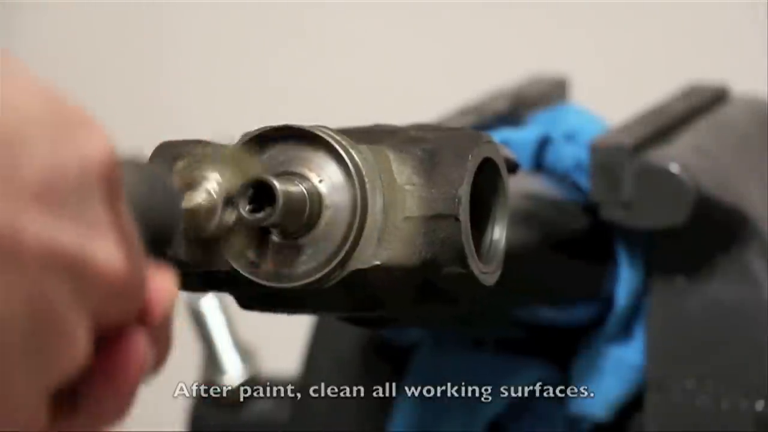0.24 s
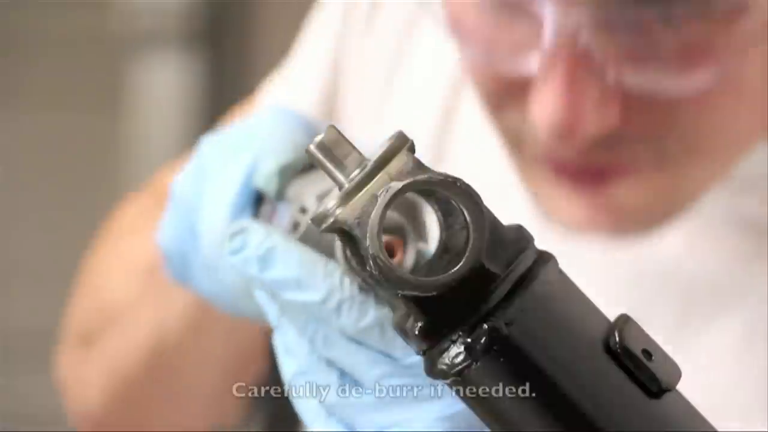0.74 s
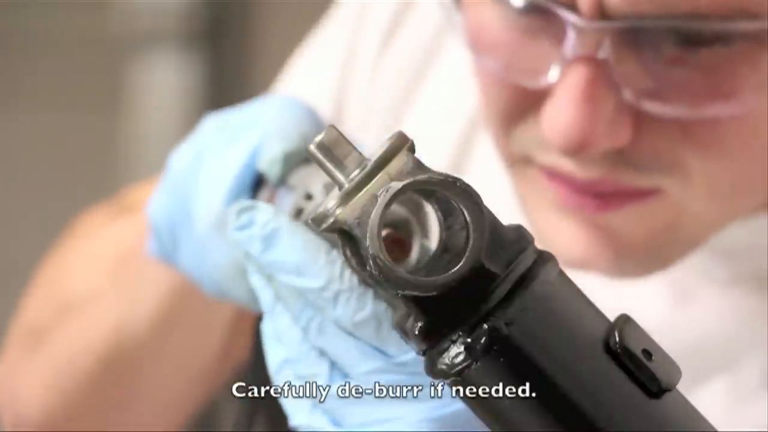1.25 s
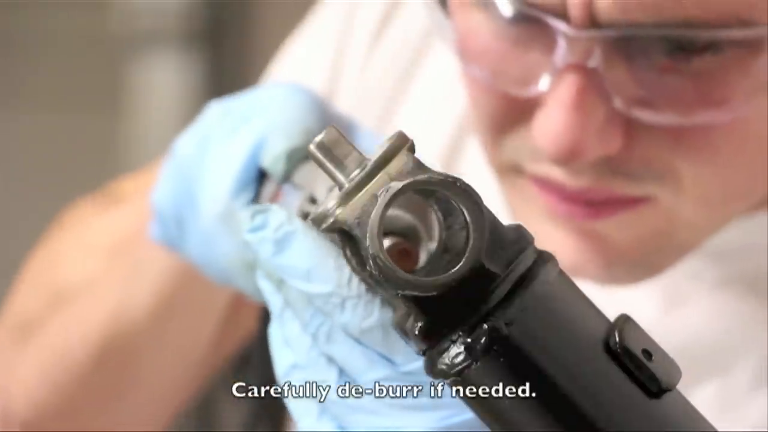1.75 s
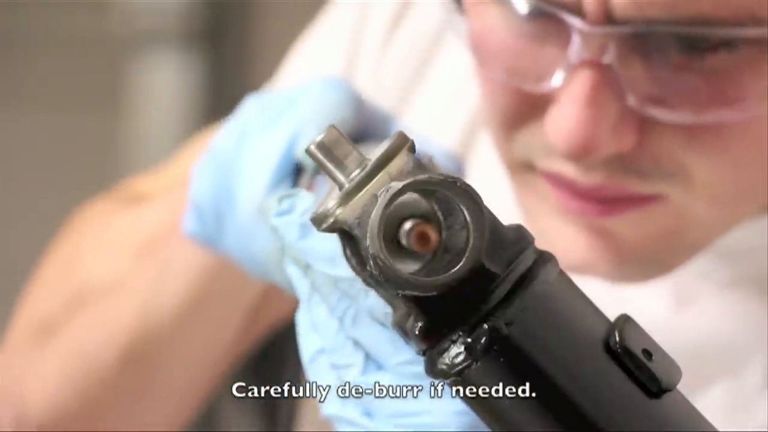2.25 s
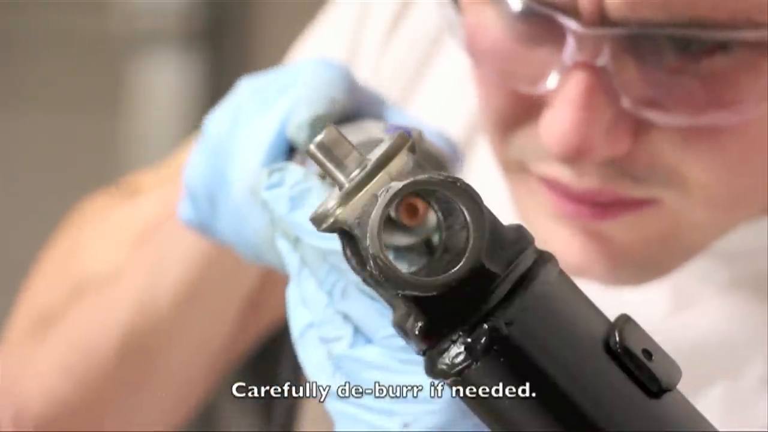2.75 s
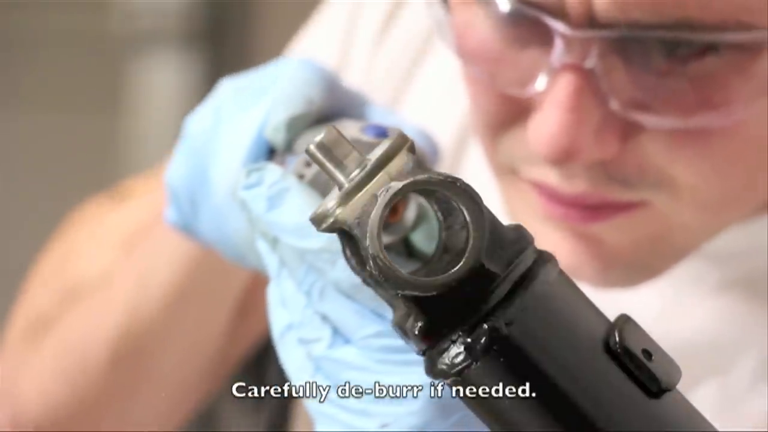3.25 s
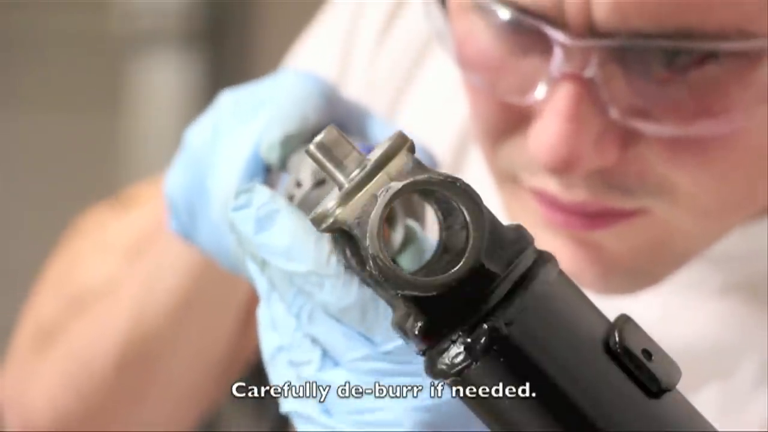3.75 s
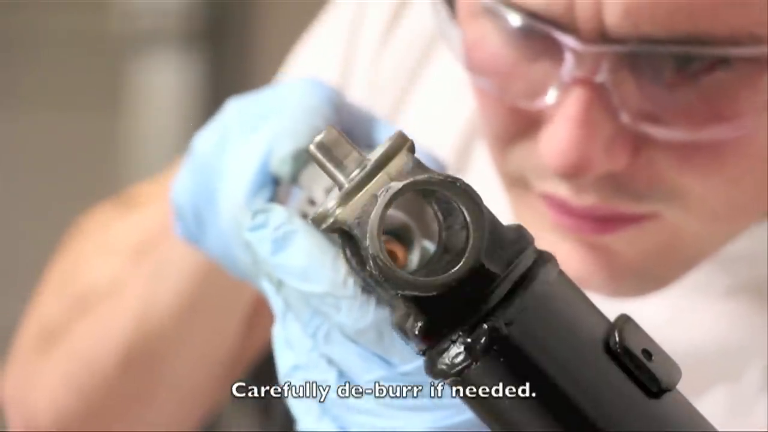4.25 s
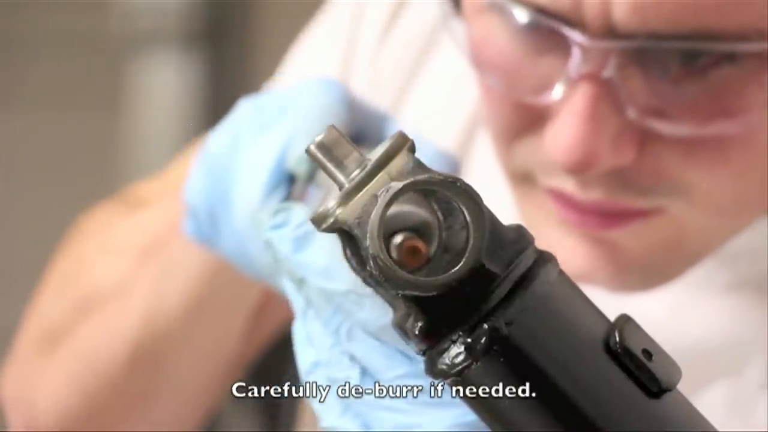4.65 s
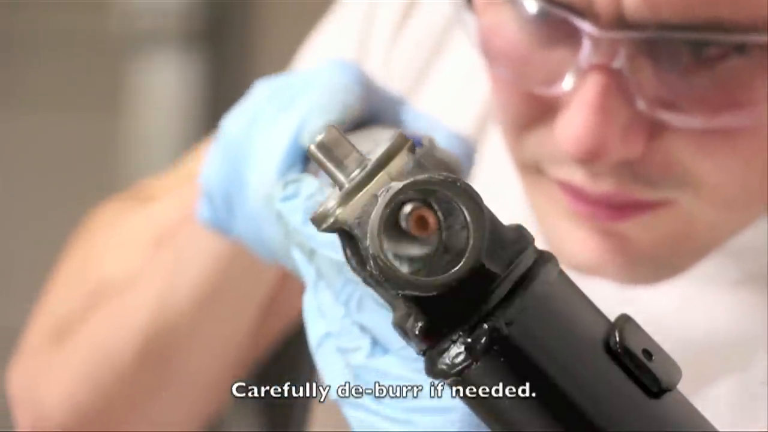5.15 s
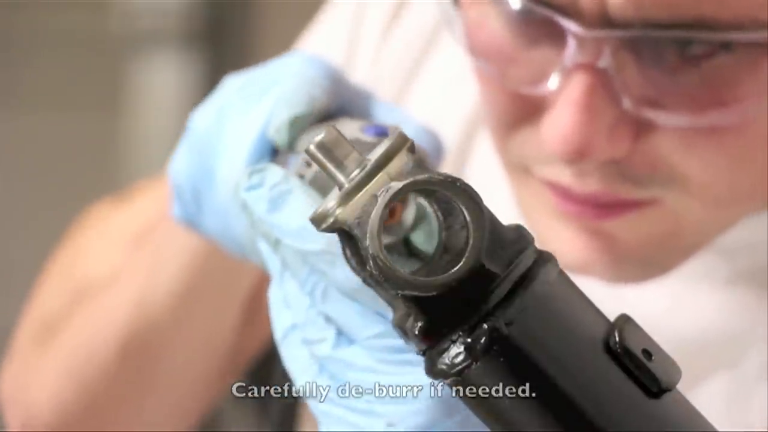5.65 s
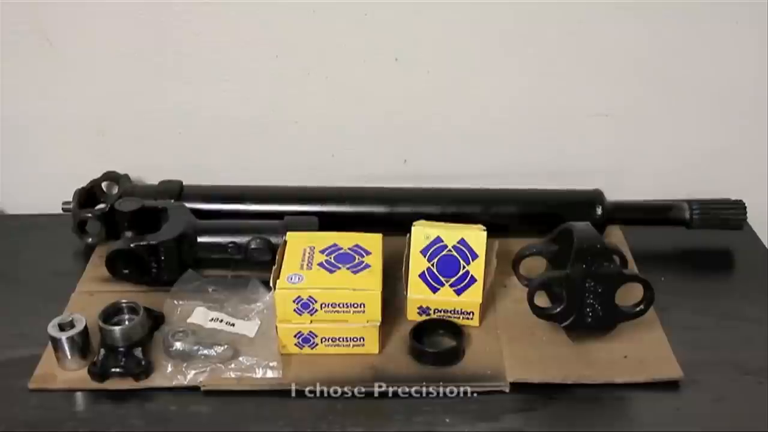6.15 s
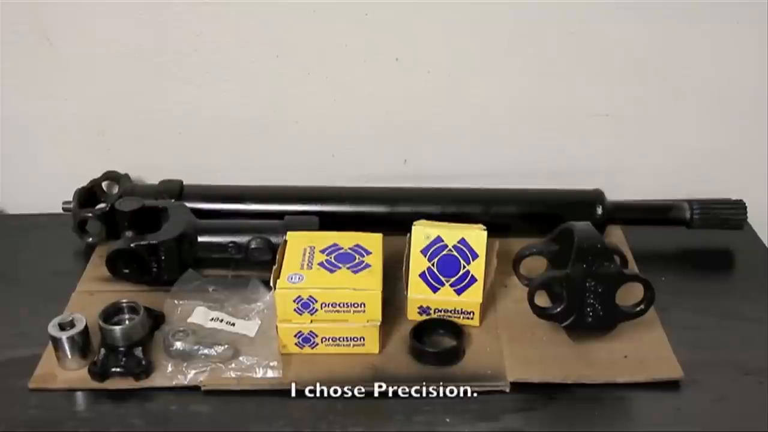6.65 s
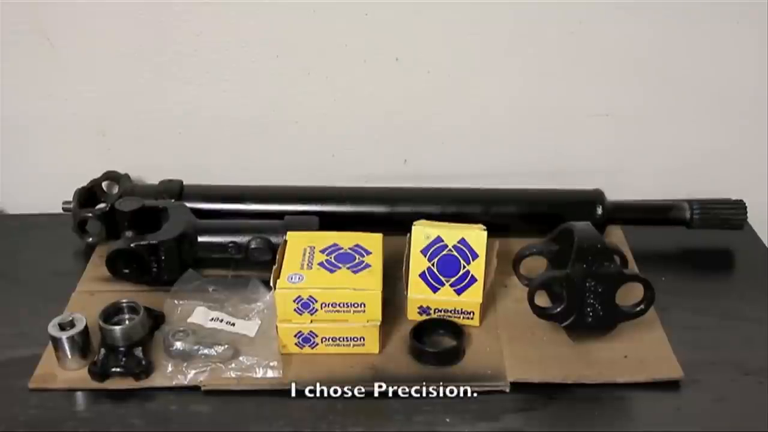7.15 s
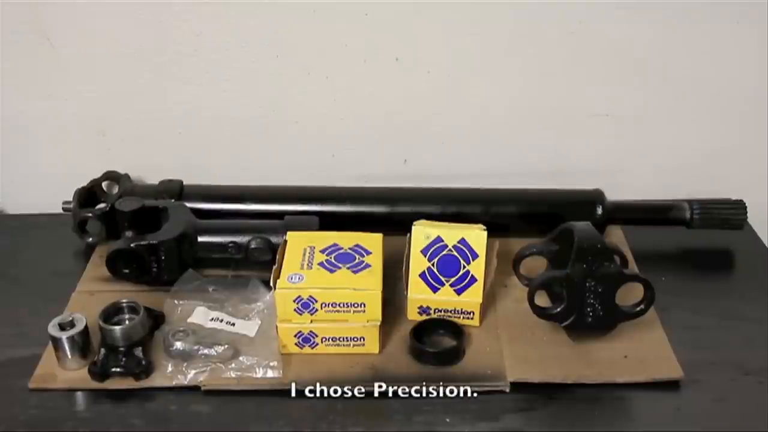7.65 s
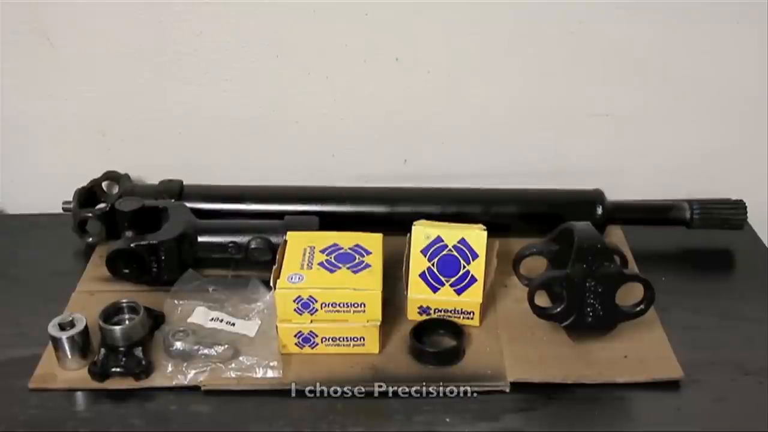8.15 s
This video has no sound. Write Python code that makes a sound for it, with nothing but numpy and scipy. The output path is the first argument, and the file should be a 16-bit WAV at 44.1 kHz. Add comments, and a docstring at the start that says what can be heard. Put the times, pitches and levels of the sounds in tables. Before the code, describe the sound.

Brief harsh metal brushing, then a high motor whine that turns rough and shrill as it grinds a bore, ending abruptly in faint room air.

```python
"""A mains-driven rotary tool in a workshop, in three scenes with fades around the cuts. First a wire brush
scrubs a metal joint: coloured noise for the bristles, ringing modes for the joint, shaft orders for the growl.
Then a grinding stone whines freely and is led round a bore: drifting shaft orders, a rough bed of blurred orders,
a hiss of grit and steel that rings and squeals. Last comes the quiet room, filtered noise and soft drones that
also lie under the tool, with a few decaying ticks and a faint swish."""
import sys
import numpy as np
from scipy import signal
from scipy.fft import rfft, irfft
from scipy.io import wavfile
from scipy.ndimage import uniform_filter1d

SR = 44100
rng = np.random.default_rng(int(sys.argv[2]) if len(sys.argv) > 2 else 0)


def transcribe(signal):
    """Save signal, clipped to [-1, 1], as a 16-bit WAV file at the path in sys.argv[1]."""
    frames = np.atleast_2d(signal).T
    limited = np.clip(frames, -1, 1)
    pcm = np.round(limited * 32767).astype(np.int16)
    wavfile.write(sys.argv[1], SR, pcm)


N = 370440
TIME = np.arange(N) / SR

# Fades around the cuts: t/s, gain/0-1
FADES = [(0, 0.91), (.53, 0.92), (.624, 0), (.632, 0), (.66, 0.54), (.72, 1), (5.86, 0.9), (5.997, 0),
         (6.001, 0), (6.006, 0.3), (6.12, 0.99), (8.4, 1)]
# Cuts between the three scenes: t/s
CUTS_S = (.628, 6.0)
MAINS_HZ = 120.0  # torque ripple, twice the line frequency
EDGE_HZ = 15750  # upper band limit

# Brush on the joint, levels before trims: t/s, scrub level/dB, shaft f/Hz, growl level/dB,
# squeal level/dB, vise level/dB
BRUSH = [(0.02, -26.5, 104.1, -47, -33, -47), (0.096, -26, 103.8, -40.5, -28.5, -44),
         (0.172, -27, 100.6, -47.5, -36, -35), (0.27, -27, 96.3, -44, -44, -37.5),
         (0.3, -27.5, 104.7, -46, -52, -42), (0.346, -27, 104.3, -46, -32.5, -32),
         (0.488, -29, 103.4, -48.5, -28, -44), (0.5, -28, 101, -71, -34, -47),
         (0.518, -29, 99.9, -50, -30, -59), (0.54, -29.5, 103.5, -55, -35, -49)]
# Colour of the bristle hiss: f/Hz, relative level per Hz/dB
BRISTLES = [(35, -52), (60, -35), (105, -28), (201, -60), (232, -24), (405, -13), (937, -15), (1360, -7.5),
            (1680, -15), (2070, -4.5), (2220, -4.5), (2490, -3), (3530, -10), (7440, -15.5), (15700, -27)]
SQUEAL_HZ = 2078
# Modes of the joint: f/Hz, width/Hz, relative level/dB
JOINT = [(2320, 14, -10), (2428, 18, -8), (2560, 14, -7), (2666, 25, -11), (3188, 10, -11), (3255, 8, -7),
         (4346, 8, -10), (4561, 12, -13), (4652, 14, -15), (7214, 25, -15), (7644, 30, -19)]
# Joint modes that sing out: f/Hz
SINGING_HZ = (2428, 2560, 3188, 3255, 4346, 4561)
# The brush finds one spot and one mode sings, a list for each of SINGING_HZ: start t/s, length/s, level/dB
JOINT_SINGS = [
    [(.12, .13, -32), (.47, .1, -36)],
    [(-.04, 0.23, -38), (.4, 0.24, -39)],
    [(0.183, 0.242, -43)],
    [(-.05, 0.25, -37), (.4, 0.13, -39)],
    [(-.06, .14, -29.5), (.06, .14, -41)],
    [(0.31, .12, -31)],
]
# Hum under the brush: f/Hz, level/dB
BRUSH_HUM = [(242, -55)]
# Growl of shaft orders 1 to 7 in turn: relative level/dB
GROWL_DB = [-8, -33, -2.5, -2, -4, -6, 1]

# Shaft speed with the stone, running up free and sagging under load: t/s, f/Hz
SPEED = [(.63, 230.5), (.8, 236.4), (1.0, 240.2), (1.2, 242.2), (1.7, 244.8), (1.9, 243.1), (1.98, 241.7),
         (2.2, 236.4), (2.43, 232.7), (2.6, 230.3), (2.8, 229.2), (2.93, 230.2), (3.03, 229.2),
         (3.18, 227.1), (3.7, 226.7), (3.8, 226.0), (4.0, 225.8), (4.1, 225.2), (4.23, 225.4), (4.4, 223.8),
         (4.6, 223.4), (4.85, 222.4), (5.13, 222.4), (5.3, 224.8), (5.42, 226.7), (5.6, 226.8),
         (5.73, 225.9), (5.95, 227.3)]
TURN_HZ = 230  # typical shaft speed with the stone
JITTER_TURNS = .004  # rms: the cutting stone snags and the shaft runs unevenly
TOUCH_S, TOUCH_RISE_S = 1.725, 0.013  # the stone meets the bore
# Contact in the free run, first bite and steady grinding: t/s, rough bed level over hiss/dB,
# ripple depth before unevenness/rad, wall resonance level/dB
CONTACT = [(.63, -12, 0.52, 2.5), (1.72, -15, 0.2, 2), (1.76, -1.5, 1.77, 6), (2.15, 0, 0.52, 15.5),
           (2.35, 1.5, 0.43, 2), (6, 0.5, 0.65, 4)]

# Unbalance of the shaft, before flutter: t/s, order 1 level/dB, order 2 level/dB, order 3 level/dB
SHAFT = [(.63, -57, -50, -53), (1.0, -50, -63, -44), (1.3, -48, -72, -44.5), (1.45, -50, -69, -52),
         (1.68, -57, -51, -52), (1.76, -45.5, -37.5, -48), (2.0, -56, -46, -47), (2.1, -53, -55, -50),
         (2.25, -49, -43, -40), (2.45, -50, -51.5, -39), (2.55, -47, -36.5, -43), (2.75, -47.5, -35.5, -48),
         (2.95, -43, -32, -39), (3.15, -55.5, -45.5, -35.5), (3.4, -55, -45, -41), (3.55, -45.5, -50, -45),
         (3.7, -40.5, -40, -55), (3.95, -37.5, -44, -48), (4.2, -38.5, -37.5, -45), (4.6, -55, -35.5, -49),
         (4.95, -44, -32, -53), (5.25, -36, -29.5, -43), (5.33, -38, -41, -45), (5.4, -44, -51, -46),
         (5.55, -48, -42, -42), (5.72, -59, -43.5, -48), (5.95, -44.5, -48, -43.5)]
# Shaft orders that stand out: order number
LOUD = (15, 16, 17, 20, 21, 23, 4, 5, 6, 7, 8, 9, 10, 11, 12, 13, 14, 18, 19, 22, 26, 24, 25)
# Each order in LOUD running free, before flutter: level/dB
IDLE_DB = [-64, -43, -46, -50, -48, -53, -48.5, -46, -51, -48, -42.5, -46, -45, -54, -44, -70, -55, -47,
           -46, -53, -67, -41, -58]
# Each order in LOUD while grinding, between flares and before flutter: level/dB
CUTTING_DB = [-43.5, -52, -41, -39, -40, -52, -47.5, -43.5, -40.5, -44.5, -36.5, -40, -39, -37.5, -42,
              -41.5, -37.5, -38.5, -38.5, -50.5, -58.5, -41, -47.5]
# An order flares where it meets a resonance of the part, a list for each in LOUD: start t/s, length/s, level/dB
FLARES = [
    [(1.83, 0.19, -47), (2.84, 0.3, -34.5), (3.95, 0.33, -45), (4.33, .5, -37), (4.84, 0.38, -40),
     (5.33, 0.33, -33)],
    [(.82, 0.062, -46), (.94, 0.085, -37), (1.14, 0.18, -42), (1.3, 0.35, -38.5), (1.49, 0.25, -42),
     (1.83, 0.13, -27), (2.03, 0.19, -29.5), (2.44, 0.44, -37), (4.14, 0.49, -39), (5.33, 0.22, -46)],
    [(1.02, 0.36, -48), (1.3, 0.2, -47), (1.7, 0.15, -29), (2.04, 0.24, -33), (2.44, 0.29, -38),
     (3.24, .13, -34), (3.43, 0.41, -43), (4.34, 0.4, -40), (5.15, .1, -41), (5.27, 0.13, -30)],
    [(2.03, 0.24, -36), (2.63, 0.54, -38), (3.33, 0.47, -38), (3.54, 0.27, -59), (4.04, 0.47, -36),
     (4.64, 0.28, -42)],
    [(.93, .14, -48), (2.33, .14, -47), (2.64, 0.53, -47), (3.54, 0.26, -47), (3.84, .2, -55),
     (4.03, 0.2, -34), (4.43, 0.26, -33.5), (4.74, 0.28, -36)],
    [(1.83, 0.099, -44), (2.03, 0.16, -40), (2.8, 0.35, -47), (4.0, .3, -41), (4.24, 0.24, -45),
     (4.8, 0.25, -37), (5.5, 0.26, -47), (4.63, 0.19, -37), (5.15, 0.3, -35)],
    [(1.75, 0.33, -53), (4.2, 0.47, -58)],
    [(1.69, 0.28, -41), (2.51, 0.23, -34), (3.94, 0.32, -43)],
    [(1.78, 0.33, -35), (2.3, 0.83, -48.5), (5.1, 0.48, -56)],
    [(1.15, 0.63, -41.5), (3.05, 0.41, -39.5), (3.7, 0.23, -40.5), (1.7, 0.2, -26.5), (1.97, 0.14, -35),
     (2.23, 0.14, -30.5), (2.53, 0.55, -28.5), (5.11, 0.8, -35.5)],
    [(1.74, 0.52, -30.5), (2.45, 0.39, -32), (2.82, 0.31, -33), (4.33, 0.69, -36.5), (4.97, 0.27, -41),
     (5.58, 0.22, -26.5)],
    [(1.15, 1, -47), (1.75, 0.32, -31.5), (2.93, 0.2, -31), (3.5, .2, -46), (4.3, 0.43, -29),
     (4.8, 0.26, -44)],
    [(2.91, 0.67, -31), (3.95, 0.23, -40), (4.14, 0.26, -34), (5.22, 0.57, -30.5), (5.42, .17, -28.5),
     (3.8, 0.39, -43)],
    [(1.74, 0.17, -46), (2.4, 0.8, -48), (3.71, 0.82, -46), (5.22, 0.45, -29)],
    [(.93, 0.1, -34), (1.14, 0.3, -33), (1.4, 0.58, -37.5), (1.86, 0.26, -36.5), (2.71, 0.2, -31),
     (4.22, 0.47, -31.5), (5.1, 0.11, -34)],
    [(2.72, .17, -40), (4.18, 0.26, -41), (5.61, 0.2, -25)],
    [(2.45, 0.14, -55), (2.92, 0.41, -33.5), (3.9, 0.28, -52), (4.35, 0.7, -37), (5.34, 0.16, -26.5),
     (5.46, 0.091, -36), (5.6, 0.27, -34)],
    [(2.01, 0.16, -27), (4.2, 0.59, -41), (5.24, 0.17, -29)],
    [(1.75, 0.41, -38), (2.82, 0.23, -32), (3.24, 0.83, -43), (3.63, .14, -41), (4.13, 0.16, -28),
     (4.33, 0.4, -34), (4.66, 0.37, -36), (5.23, 0.37, -37), (5.33, 0.11, -23)],
    [(1.22, 0.22, -38), (2.33, 0.15, -41), (2.73, 0.56, -44), (3.95, 0.88, -39), (4.74, 0.33, -31)],
    [(3.55, 0.91, -38.5), (4.25, 0.14, -38), (4.62, 0.44, -30)],
    [(.68, 0.14, -35.5), (.91, 0.35, -45), (1.11, 0.41, -40.5), (1.52, 0.65, -38.5), (1.76, 0.31, -48),
     (2.3, 0.42, -41), (2.75, 0.41, -36), (3.15, 0.41, -43), (4.04, 0.27, -36), (4.22, 0.33, -35),
     (4.85, 0.13, -39)],
    [(3.89, 0.18, -32), (4.12, 0.63, -34), (4.62, 0.29, -35), (4.84, 0.16, -23)],
]
FLARE_EDGE_S = 0.073  # longest swell or fade of a flare, squeal or singing mode
FLUTTER_DB, LOW_FLUTTER_DB = 2.0, 1.0  # rms: upper orders throughout, lowest three only while cutting
# Fan orders, swelling with order 24: order number
FAN = (32, 40, 47, 48)
# Each fan order, before load, waking and cutting: level over order 24/dB
FAN_DB = [-9, -10, -17, -11]
FAN_CUT_DB = -12  # the fan orders sink once the stone cuts
# Hum of the motor windings, before the load fade: f/Hz, level/dB
HUM = [(120, -62), (360, -48.5)]
# Fade of the hum as the load grows: t/s, gain/dB
HUM_FADE = [(.65, 0), (2.3, 0), (3.2, -10), (6, -12)]
LOW_RIPPLE, MID_RIPPLE, HIGH_RIPPLE = 0.31, 1.48, 0.69  # shares on orders 2 to 3, 4 to 6 and above
WOBBLE_PER_ORDER, WOBBLE_MOST = 0.044, 0.37  # wandering of an order, as a share of its steady part
THROB_DB = 6.5  # loudness throb of the orders, per turn of shake
BOUNCE = 0.2  # rms share: in fits the stone bounces and bites harder on every second turn

# Stone in the bore, levels before trims: t/s, bore boom level/dB, wall rasp level/dB, grit fizz level/dB,
# wall resonance f/Hz
GRIND = [(0.72, -25, -28, -40.5, 3800), (0.86, -30, -34, -38, 3830), (1.26, -26, -30, -33, 3920),
         (1.7, -27, -30, -33.5, 3920), (1.77, -21, -27, -25.5, 4340), (1.8, -19.5, -26.5, -28, 4080),
         (2.13, -23, -29, -30.5, 4260), (2.34, -26, -22.5, -37.5, 4000), (2.67, -23, -27, -33.5, 3960),
         (2.82, -22, -25, -31.5, 3620), (2.92, -23, -20, -31.5, 4342), (2.99, -19.5, -27, -31.5, 3562),
         (3.22, -19.5, -24, -36, 3340), (3.25, -20, -24, -31.5, 3500), (3.48, -22.5, -22, -35.5, 4240),
         (3.94, -24, -24.5, -33, 4447), (4.08, -26.5, -25, -32, 3650), (4.17, -23.5, -27.5, -28.5, 4374),
         (4.5, -24, -26, -27.5, 4130), (4.97, -28, -26.5, -32, 3690), (5.06, -28, -25, -35.5, 3560),
         (5.33, -21.5, -23.5, -30, 4343), (5.45, -20.5, -20.5, -36, 3370), (5.5, -20, -25, -33.5, 3460),
         (5.72, -19, -27.5, -35, 3240), (5.88, -23, -26, -37, 3707)]
# Low body of the stone's sound: t/s, level/dB
BODY = [(.72, -42), (1.2, -36), (1.75, -36), (2.2, -42.5), (2.8, -36.5), (3.2, -40), (3.7, -35.5),
        (4.2, -38), (4.6, -43.5), (5.0, -41), (5.2, -33), (5.5, -40.5), (5.9, -39)]
# Colour of the stone's sound: f/Hz, relative level per Hz/dB
COLOUR = [(88, -79.5), (150, -55.5), (221, -0.5), (280, -21.5), (335, -7), (389, 1), (446, -2.5),
          (521, 1.5), (671, -3.5), (754, 0), (2520, -0.5), (5590, -3), (12700, -16), (14000, -28.5),
          (14800, -29), (15700, -26)]
# Centres of body, bore, wall and grit: f/Hz
PARTS_HZ = (900, 2000, 4500, 10000)
# Ringing modes of the steel, a list for each ring: f/Hz, width/Hz, relative level/dB
STEEL = [
    [(5486, 16, 0)],
    [(5561, 14, 0)],
    [(6822, 8, 0), (6632, 20, -12), (7720, 20, -12)],
    [(7235, 12, 0), (6977, 14, -6)],
    [(12958, 14, 0), (12279, 25, -5)],
    [(15106, 40, -3), (15190, 60, -4), (14158, 25, -14)],
]
# Each ring of the steel between squeals: level/dB
RING_DB = [-41.5, -40, -53, -62, -48.5, -53]
# The stone catches and a ring squeals, a list for each ring in STEEL: start t/s, length/s, level/dB
SQUEALS = [
    [(1.72, 0.27, -30), (2.8, 0.11, -20), (2.88, 0.26, -31), (4.32, 0.39, -31.5)],
    [(1.85, 0.44, -38), (2.5, .16, -52), (3.1, 0.17, -40), (3.9, 0.22, -35), (4.75, .32, -40.5),
     (5.13, 0.15, -27), (5.33, 0.37, -40)],
    [(1.75, 0.26, -37), (2.76, 0.58, -31), (3.09, 0.26, -31.5), (3.35, 0.19, -33), (3.65, 0.58, -27.5),
     (5.35, 1, -32)],
    [(2.9, 0.55, -33), (3.68, 0.54, -29.5), (5.33, 0.84, -30.5)],
    [(1.84, 0.18, -45), (3.07, 0.27, -46), (3.65, 0.15, -43), (4.05, 0.17, -48), (4.38, 0.15, -37),
     (5.63, 0.2, -44)],
    [(1.72, 0.22, -45), (2.78, 0.65, -40.5), (3.65, 0.27, -53), (4.14, .4, -44), (4.95, 0.46, -54.5),
     (5.45, 0.17, -44)],
]
# Stereo likeness of the tool: f/Hz, left-right correlation/-1 to 1
SAME = [(60, 1), (150, 1), (380, 0.96), (950, 0.91), (2380, 0.66), (5980, 0.39), (15000, -0.46)]
# Stereo lean of the grinder: f/Hz, left over right level/dB
LEAN = [(60, -5.5), (180, 1.5), (550, 0.5), (1650, 0.5), (4970, -0.5), (15000, -1.5)]

# Colour of the room air: f/Hz, relative level per Hz/dB
ROOM = [(15, -71.5), (25, -44), (45, -35), (91, -10), (126, -34.5), (241, -14), (391, -15.5), (447, -18.5),
        (498, -16.5), (925, -18), (1500, -21.5), (2130, -23), (9150, -32.5), (13700, -39), (15700, -44)]
AIR_DB, ROOM_UNDER_TOOL_DB = -53.5, -4.5  # air level in the quiet scene; the room is set lower under the tool
# Stereo likeness of the room: f/Hz, left-right correlation/-1 to 1
ROOM_SAME = [(60, 0.99), (180, -0.21), (550, 0.039), (1650, -0.54), (4970, -0.2), (15000, -0.17)]
# Distant machines, at their level in the quiet scene: f/Hz, width/Hz, level/dB
ROOM_DRONE = [(55.3, 8.6, -72.5), (132, 17, -61), (188.4, 12.95, -63), (248.7, 10, -68), (440, 8, -72),
              (992, 55, -68)]
# Small ticks: t/s, level before decay and onset/dB, f/Hz, 60 dB decay time/s
TICKS = [(6.0134, -31, 1600, 0.012), (6.0155, -36, 4145, 0.0092), (6.017, -24, 1570, 0.007),
         (6.0205, -34, 1750, .01), (6.858, -46, 3000, 0.004), (6.97, -42, 2070, 0.005),
         (7.0, -46, 2600, .004), (7.0094, -44, 4800, 0.009), (7.0194, -44, 2500, 0.005)]
# A faint swish: t/s, level/dB
RUSTLE = [(6.75, -90), (6.85, -69), (6.92, -64), (6.97, -58), (7.03, -61), (7.07, -90)]
# Colour of the swish: f/Hz, relative level per Hz/dB
RUSTLE_COLOUR = [(800, -18), (2100, -1), (4500, -7), (10000, -10), (15000, -30)]


def gain_of(db):
    """Decibels to a factor."""
    return 10 ** (np.asarray(db) / 20)


def evened(x):
    """Scales to rms 1."""
    return x / np.sqrt(np.mean(abs(x) ** 2) + 1e-20)


def read(points, hz):
    """Reads a spectrum on a log-frequency axis."""
    f, value = np.transpose(points)
    return np.interp(np.log(hz + 1), np.log(f + 1), value)


def columns(rows, t):
    """Reads every column of a curve at the times t."""
    s, *rest = np.transpose(rows)
    return [np.interp(t, s, c) for c in rest]


def alike(hz):
    """Left-right likeness of a tone of the tool."""
    return max(read(SAME, hz), .35)


def pair(a, b, same):
    """Two channels correlated by same, mixed from two independent signals."""
    same = np.clip(same, -1, 1)
    return np.array([a, same * a + np.sqrt(1 - same ** 2) * b])


def flicker(count, slow=False):
    """Smooth chance that changes some tens of times a second, or half as often if slow; rms 1."""
    wide = 2 if slow else 1
    smooth = uniform_filter1d(rng.standard_normal(count), size=600 * wide)
    return evened(uniform_filter1d(smooth, size=450 * wide))


def swells(rows, t):
    """Sum of swell-hold-fade shapes, as a factor."""
    start, length, db = np.transpose(rows)[:, :, None]
    s = t[::64]  # coarse time grid
    edge = np.clip(np.minimum(s - start, start + length - s) / FLARE_EDGE_S, 0, 1)
    shapes = gain_of(db) * np.sin(np.pi / 2 * edge) ** 2
    return np.interp(t, s, shapes.sum(0))


def hiss(count, colour, same, patchy_db):
    """Stereo noise from random short-time spectra, with drifting louder and softer patches; rms 1."""
    frames, hz = count // 256 + 5, np.fft.rfftfreq(1024, 1 / SR)
    a, b, c, d, patches = rng.standard_normal((frames, 513, 5)).T
    patches = uniform_filter1d(patches, size=10, axis=0)  # smooth over frequency
    patches = evened(uniform_filter1d(patches, size=12, axis=1))  # and over time
    spectra = pair(a + 1j * b, c + 1j * d, read(same, hz)[:, None])
    spectra = spectra * gain_of(read(colour, hz)[:, None] + patchy_db * patches)
    return evened(signal.istft(spectra, nperseg=1024, noverlap=768)[1][:, :count])


def ring(count, hz, width_hz, same):
    """A two-pole mode kept ringing by random blows, rms 1."""
    r = np.exp(-np.pi * width_hz / SR)
    blows = pair(*rng.standard_normal((count + SR // 4, 2)).T, same)  # a quarter second to settle
    ringing = signal.lfilter([1, 0, -1], [1, -2 * r * np.cos(2 * np.pi * hz / SR), r * r], blows)
    return evened(ringing[:, -count:])


def tone(turns, wobble, same, per_s):
    """A sine whose size and phase wander, a little differently at each ear; rms about 1 in the middle."""
    s = np.arange(0, len(turns) / SR + 1, 1 / 200)
    pole = np.exp(-2 * np.pi * per_s / 200)
    noise = evened(signal.lfilter([1], np.poly([pole, pole]), rng.standard_normal((len(s), 4)).T))
    apart = np.arccos(np.clip(same, -1, 1)) / 2 * rng.choice([-1, 1])  # half the phase between the ears
    start = 2 * np.pi * rng.random()
    steady = np.exp(1j * (start + np.array([[apart], [-apart]]))) / np.cos(apart)
    wander = pair(noise[0] + 1j * noise[1], noise[2] + 1j * noise[3], 0.85 * same)
    size = steady + wobble * wander
    t, turn = np.arange(len(turns)) / SR, 2 * np.pi * turns
    cos, sin = np.cos(turn), np.sin(turn)
    out = [np.interp(t, s, z.real) * cos - np.interp(t, s, z.imag) * sin for z in size]
    return np.array(out) * np.sqrt(2 / (1 + 2 * wobble ** 2))


def bristles(t, turns, scrub_db, vise_db):
    """Bristles hiss over the joint, throbbing with the uneven wheel, and the vise answers broadly."""
    scrub = gain_of(scrub_db + 1) * hiss(len(t), BRISTLES, SAME, patchy_db=2.5)
    # the uneven wheel throbs once and twice a turn
    scrub *= 1 + 0.068 * np.cos(2 * np.pi * turns) + 0.082 * np.cos(2 * np.pi * 2 * turns)
    vise = gain_of(vise_db + 1.5) * ring(len(t), 1220, 500, 0.95)
    return scrub + vise


def joint(t, turns, scrub_db, squeal_db):
    """The brushed joint rings in narrow modes and squeals, fed once a turn."""
    squeal = gain_of(squeal_db) * tone(SQUEAL_HZ * t, 0.12, 0.7, 9.0)
    modes = gain_of(scrub_db - 5.0) * sum(gain_of(db) * ring(len(t), f, w, 1.0) for f, w, db in JOINT)
    modes += sum(swells(rows, t) * tone(f * t, 0.4, 0.9, 11.0) for f, rows in zip(SINGING_HZ, JOINT_SINGS))
    throb = 1 + 0.33 * np.cos(2 * np.pi * turns)
    return squeal * np.sqrt(throb) + modes * throb


def growl(t, turns, growl_db):
    """The loaded shaft growls in its first seven orders, over a steady hum."""
    orders = sum(gain_of(growl_db + db) * tone((k + 1) * turns, 0.8, 1.0, 7.0) for k, db in enumerate(GROWL_DB))
    hum = sum(gain_of(db) * tone(f * t, 0.14, 0.94, 6.4) for f, db in BRUSH_HUM)
    return orders + hum


def brush(t):
    """The wire brush at work: bristles, ringing joint and growling shaft share one rotation."""
    scrub_db, hz, growl_db, squeal_db, vise_db = columns(BRUSH, t)
    turns = np.cumsum(hz) / SR
    scrub = bristles(t, turns, scrub_db, vise_db)
    return scrub + joint(t, turns, scrub_db, squeal_db) + growl(t, turns, growl_db)


def room():
    """Air as coloured noise and distant machines as broad resonances, lower under the tool."""
    out = gain_of(AIR_DB) * hiss(N, ROOM, ROOM_SAME, patchy_db=0.5)
    out += sum(gain_of(db) * ring(N, f, w, 0.75) for f, w, db in ROOM_DRONE)
    return out * np.where(TIME < CUTS_S[1], gain_of(ROOM_UNDER_TOOL_DB), 1)


def bench():
    """The bench rumbles in one low mode that follows the motor's hum, through both tool scenes."""
    level = gain_of(-62.0 + 0.67 * columns(HUM_FADE, TIME)[0])
    return level * ring(N, 59, 6.9, 0.68) * (TIME < CUTS_S[1])


def touch(t):
    """0 while the stone runs free, 1 once it cuts."""
    return np.clip((t - TOUCH_S) / TOUCH_RISE_S, 0, 1)


def ripple(t):
    """The motor pushes harder twice in each mains cycle: a to-and-fro of one radian, in turns."""
    return np.sin(2 * np.pi * MAINS_HZ * t) / (2 * np.pi)


def order_levels(t, low_db, load_db):
    """Lists (order, level) for unbalance, bore howl, commutator and fan, fluttering in level."""
    flutter = flicker(len(t), slow=True)

    def shifted_flutter():
        return np.roll(flutter, rng.integers(len(t)))

    # the lowest three orders flutter only while cutting, the upper ones throughout
    low = [gain_of(db + LOW_FLUTTER_DB * touch(t) * shifted_flutter()) for db in low_db]
    loud = []
    for idle_db, cut_db, rows in zip(IDLE_DB, CUTTING_DB, FLARES):
        base = gain_of(idle_db + (cut_db - idle_db) * touch(t))
        loud.append(gain_of(FLUTTER_DB * shifted_flutter()) * (base + swells(rows, t)))
    waking_db = np.minimum(18 * (t - 1.2), 0)  # the fan orders emerge as the speed rises
    fan_db = load_db + waking_db + FAN_CUT_DB * touch(t)
    fan = [loud[-2] * gain_of(db + fan_db) for db in FAN_DB]  # loud[-2] is order 24
    return [*zip((1, 2, 3), low), *zip(LOUD, loud), *zip(FAN, fan)]


def ripple_share(k):
    """Ripple puts side lines on the orders: strong on 4 to 6, weak on 2 and 3, none on the first."""
    if k > 6:
        return HIGH_RIPPLE
    if k > 3:
        return MID_RIPPLE
    return LOW_RIPPLE * (k > 1)


def motor(t, turns, low_db, shake):
    """Wandering sines at multiples of the shaft speed, shaken by the torque ripple, and the windings' hum."""
    load_db = columns(HUM_FADE, t)[0]
    orders = 0
    for k, level in order_levels(t, low_db, load_db):
        wobble = min(0.071 + WOBBLE_PER_ORDER * k, WOBBLE_MOST)
        orders = orders + level * tone(k * turns + ripple_share(k) * shake, wobble, alike(k * TURN_HZ), 8.3)
    bounce = BOUNCE * touch(t) * flicker(len(t), slow=True) * np.cos(np.pi * turns)
    orders = orders + bounce * (orders - uniform_filter1d(orders, size=40))  # the lowest hardly follow it
    hum = gain_of(load_db) * sum(gain_of(db) * tone(f * t, 0.36, 0.9, 4.4) for f, db in HUM)
    return orders * gain_of(THROB_DB * shake) + hum


def rough_bed(turns, shake):
    """A rough bed of wandering shaft orders, strongest near the twelfth, blurred higher up."""
    bed = sum(gain_of(3 - .012 * (k - 12) ** 2)
              * tone(k * turns + shake, 2.5, alike(k * TURN_HZ), 2.5 + .2 * k)
              for k in range(6, 50) if k not in LOUD)
    return bed * np.sqrt(2 * TURN_HZ / SR)  # as strong as white noise over the band of one order


def stone(t, turns, shake):
    """A rough bed of orders and a hiss of grit, whose colour shifts as the stone travels round the bore."""
    bed_db = columns(CONTACT, t)[0]
    bed = gain_of(bed_db) * rough_bed(turns, shake)
    grit = hiss(len(t), [(20, 0), (20000, 0)], SAME, patchy_db=2.0)
    grit *= 1 + 0.21 * touch(t) * np.cos(2 * np.pi * turns)  # the grit bites once a turn
    # the rough noise flickers in level some tens of times a second throughout
    flicker_db = 1.0 * flicker(len(t))
    rough = (bed + grit) * gain_of(flicker_db + 7.8 * shake)
    hz, s, spectra = signal.stft(rough, SR, nperseg=1024)
    s = s + t[0]
    bore_db, wall_db, grit_db, wall_hz = columns(GRIND, s)
    levels = np.array([columns(BODY, s)[0], bore_db - 3.5, wall_db - 6, grit_db + 6.5])
    # each part fades into its neighbours along the log-frequency axis
    shares = np.array([np.interp(np.log(hz + 1), np.log(PARTS_HZ), row) for row in np.eye(4)])
    wall_peak_db = columns(CONTACT, s)[2] * np.exp(-((hz[:, None] - wall_hz) / 450) ** 2)
    colour = gain_of(read(COLOUR, hz))
    colour /= np.sqrt(np.mean(colour ** 2 * shares[1]))  # the bore part sets the scale
    spectra = spectra * colour[:, None] * gain_of(shares.T @ levels + wall_peak_db)
    return signal.istft(spectra, SR, nperseg=1024)[1][:, :len(t)]


def steel(t):
    """Modes of the part ring once the stone touches it, and squeal where it catches."""
    out = 0
    for base_db, rows, modes in zip(RING_DB, SQUEALS, STEEL):
        level = gain_of(base_db) + swells(rows, t)
        out = out + level * sum(gain_of(db) * ring(len(t), f, w, alike(f)) for f, w, db in modes)
    return touch(t) * out


def grinder(t):
    """The tool with the stone on one shaft, leaning a little to one side by frequency."""
    hz, low_db = columns(SPEED, t)[0], columns(SHAFT, t)
    turns = np.cumsum(hz) / SR + JITTER_TURNS * touch(t) * flicker(len(t), slow=True)
    uneven = 1 - touch(t) * (.2 - .35 * flicker(len(t), slow=True))  # ripple under load
    shake = columns(CONTACT, t)[1] * ripple(t) * uneven  # in turns
    both = motor(t, turns, low_db, shake) + stone(t, turns, shake) + steel(t)
    lean_db = read(LEAN, np.fft.rfftfreq(len(t), 1 / SR)) * np.array([[.5], [-.5]])
    return irfft(rfft(both) * gain_of(lean_db), len(t))


def ticks():
    """Small ticks: sines with a brief linear onset and an exponential decay."""
    out = np.zeros(N)
    t = np.arange(600) / SR
    for s, db, hz, t60 in TICKS:
        onset = np.minimum(t / (0.16 * t60), 1)
        start = round(s * SR)
        out[start:start + len(t)] += gain_of(db - 60 * t / t60) * np.sin(2 * np.pi * hz * t) * onset
    return out


def swish():
    """A faint swish of coloured noise in the quiet scene."""
    noise = hiss(N, RUSTLE_COLOUR, SAME, patchy_db=1.5)
    return gain_of(columns(RUSTLE, TIME)[0]) * noise * (TIME > CUTS_S[1])


def scene():
    """Brush, grinder and quiet one after another, over the room."""
    a, b = (round(s * SR) for s in CUTS_S)
    tool = np.concatenate([brush(TIME[:a]), grinder(TIME[a:b]), np.zeros((2, N - b))], axis=1)
    return tool + room() + bench() + ticks() + swish()


def record(dry):
    """Fades around the cuts, then the band limit."""
    faded = dry * np.clip(columns(FADES, TIME)[0], 0, 1)
    low_pass = signal.firwin(1023, EDGE_HZ, window=("kaiser", 9), fs=SR)
    return signal.oaconvolve(faded, low_pass[None], "same")


dry = scene()
out = record(dry)
transcribe(out)
```